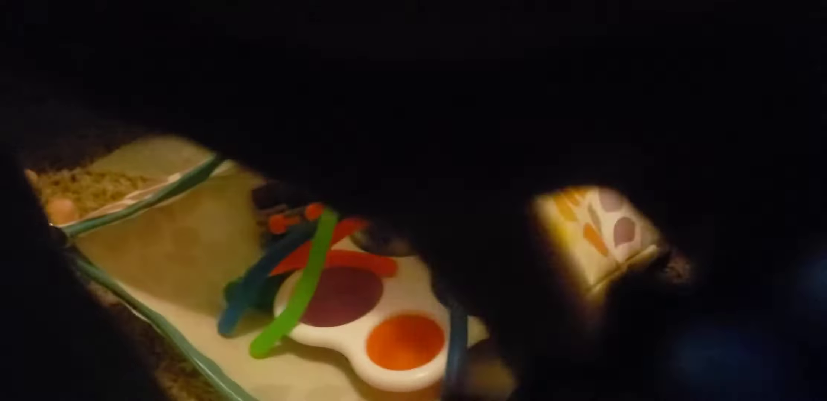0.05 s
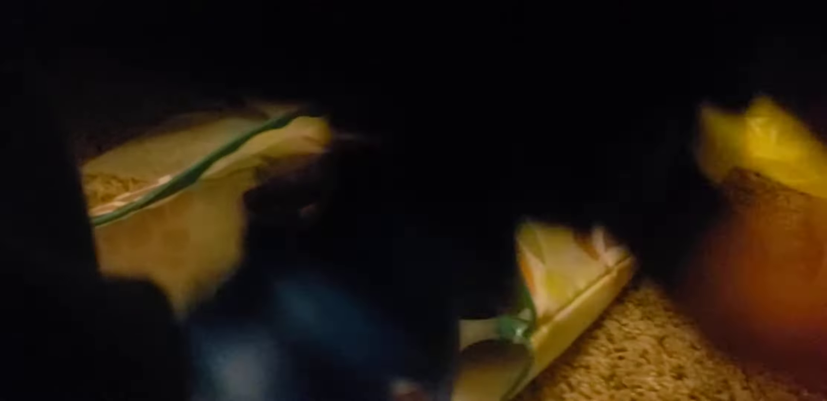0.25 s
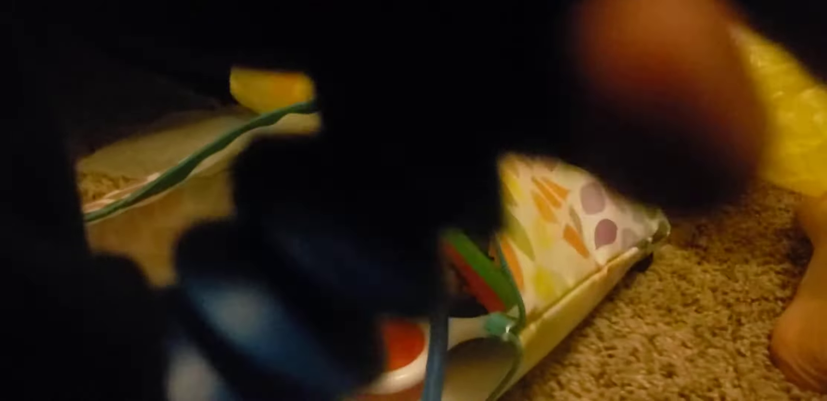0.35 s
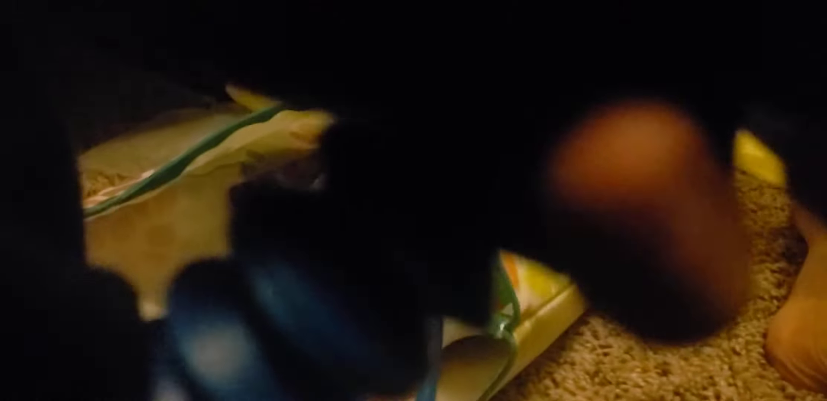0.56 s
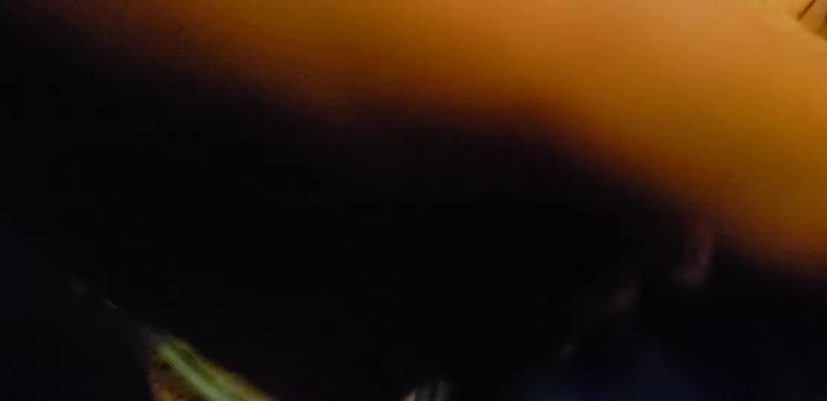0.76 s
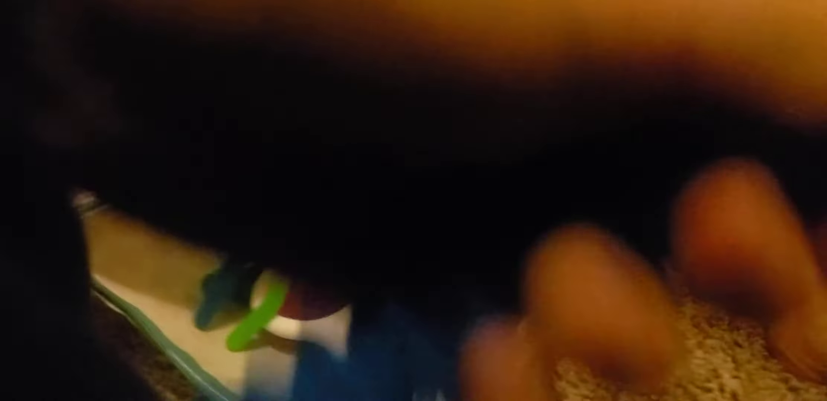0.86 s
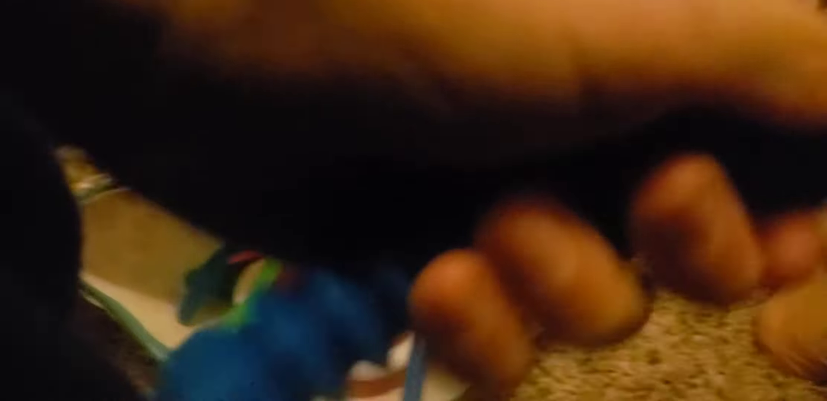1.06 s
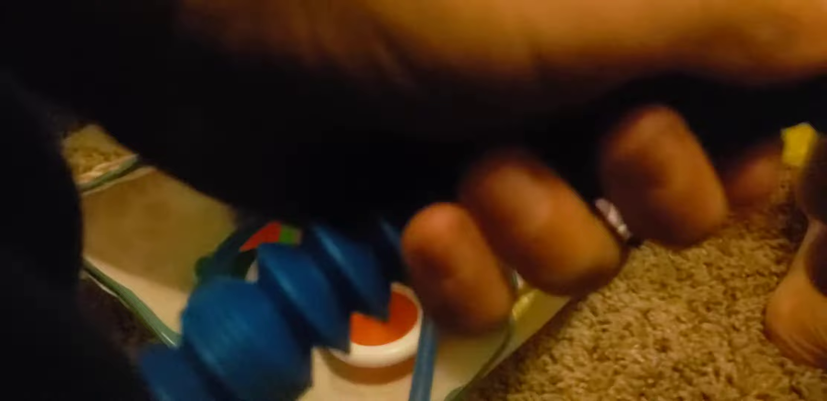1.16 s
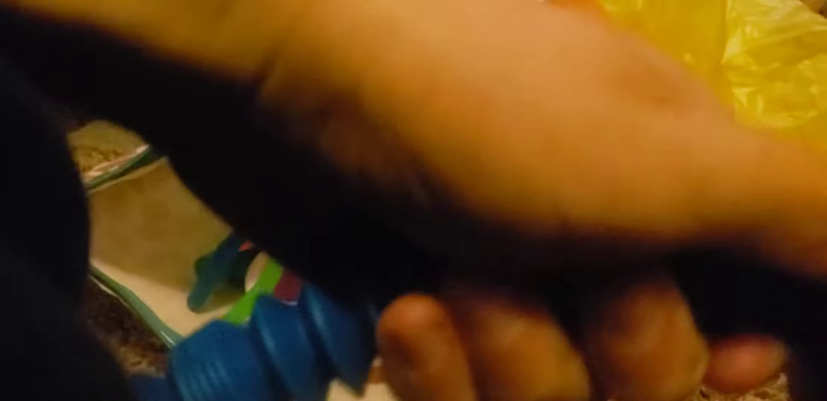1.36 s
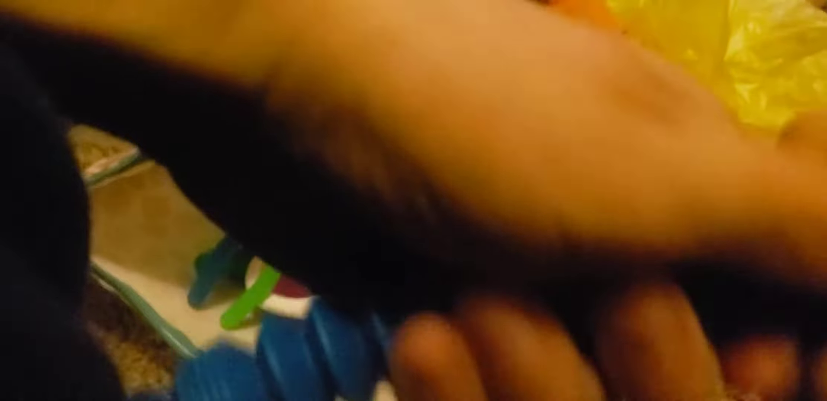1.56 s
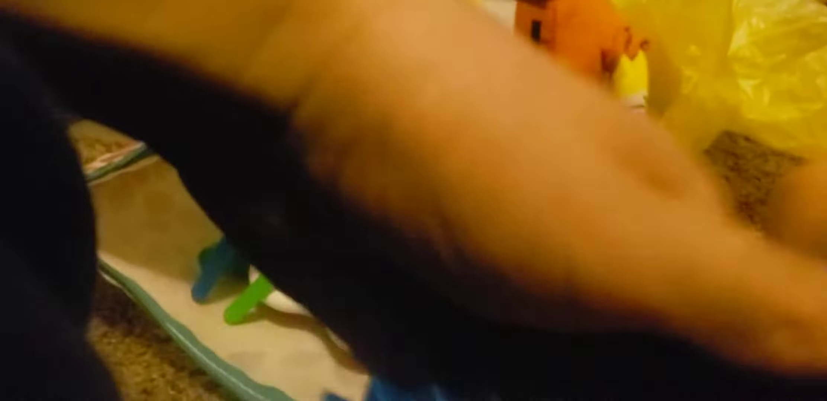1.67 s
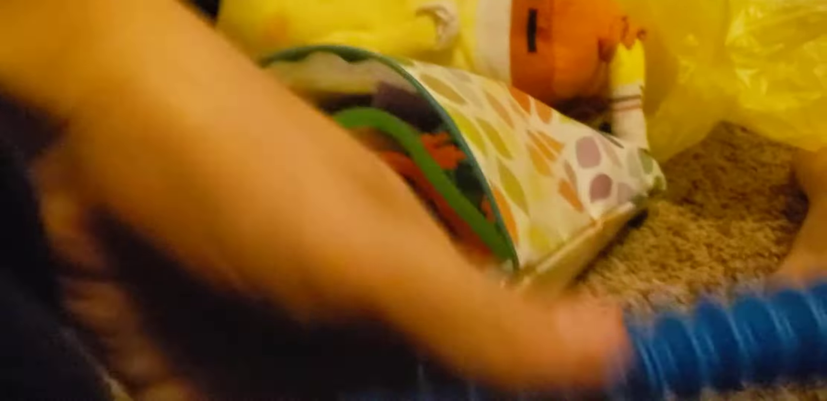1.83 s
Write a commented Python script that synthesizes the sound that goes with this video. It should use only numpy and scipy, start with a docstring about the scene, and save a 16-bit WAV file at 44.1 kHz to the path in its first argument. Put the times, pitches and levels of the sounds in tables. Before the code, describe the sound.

Sharp hollow pops and clicks from a corrugated plastic tube flexed by hand, close up.

```python
"""A corrugated plastic toy tube is worked in the hands, close up, in a small carpeted room.
Rib after rib snaps over: the thin wall cracks and the air column inside rings, higher as the tube
gets shorter. The creased plastic crinkles after each pop. Between pops the ribs tick; the hands
rub softly along the plastic and take up the jolts with dull thumps."""
import sys
import numpy as np
from scipy import signal
from scipy.fft import rfft, irfft
from scipy.io import wavfile
from scipy.ndimage import uniform_filter1d

SR = 44100
rng = np.random.default_rng(int(sys.argv[2]) if len(sys.argv) > 2 else 0)


def put_to_file(sound):
    """Save the sound as 16-bit audio at rate SR, in the file named by the first command-line argument."""
    columns = np.atleast_2d(sound).T  # one column per channel
    safe = np.clip(columns, -1, 1)
    whole_steps = np.round(safe * 32767)
    wavfile.write(sys.argv[1], SR, whole_steps.astype(np.int16))


N = 83790


def from_db(db):
    """Decibels to gain."""
    return 10 ** (np.asarray(db) / 20)


def at_hz(points, hz):
    """Interpolate a table on a log-frequency axis."""
    table_hz, values = np.transpose(points)
    return np.interp(np.log(np.maximum(hz, 1)), np.log(table_hz), values)


def in_time(rows):
    """Interpolate a time curve at every sample."""
    return np.interp(np.arange(N) / SR, *np.transpose(rows))


def coloured(x, points, share=1):
    """Zero-phase EQ; share scales the dB curve."""
    n = x.shape[-1]
    gain = from_db(share * at_hz(points, np.fft.rfftfreq(2 * n, 1 / SR)))
    return irfft(rfft(x, 2 * n) * gain, 2 * n)[..., :n]


def high_pass(x, hz):
    """Second-order bass cut."""
    return signal.sosfilt(signal.butter(2, hz, "high", fs=SR, output="sos"), x)


def stereo_noise(size, side_db):
    """White noise, nearly the same in both channels."""
    mid, side = rng.standard_normal((2, size))
    return mid + from_db(side_db) * side * np.array([[1], [-1]])


def grain(rate_hz, spread_db):
    """Fast random gain flicker."""
    flicker = uniform_filter1d(rng.standard_normal(N), int(SR / rate_hz))
    return from_db(spread_db * flicker / flicker.std())


def add(out, start_s, sound):
    """Mix a sound into a track."""
    i = int(start_s * SR)
    out[i:i + len(sound)] += sound[:N - i]


def burst(hz, peak_s):
    """Heavily damped resonance; the envelope reaches 1 at peak_s."""
    t = np.arange(SR // 5) / SR
    return -t / peak_s * np.exp(1 - t / peak_s) * np.sin(2 * np.pi * hz * t)


# Rub envelope: time_s, level_db
RUB_LEVEL = [(0, -59), (0.03, -55), (0.09, -68.5), (0.14, -63.5), (0.19, -58), (0.24, -58.5), (0.55, -66.5),
             (0.62, -54), (0.69, -57), (0.73, -49), (0.77, -53), (0.81, -64), (0.9, -55), (0.94, -68),
             (1.0, -55), (1.07, -51.5), (1.19, -54), (1.25, -70), (1.32, -66.5), (1.4, -68.5),
             (1.55, -66.5), (1.575, -59), (1.6, -71), (1.64, -56), (1.7, -59.5), (1.75, -56), (1.82, -53),
             (1.88, -66)]
# Rub spectrum: freq_hz, gain_db
RUB_SPECTRUM = [(880, -47), (1500, -19), (1780, -16.5), (1980, -23), (2340, -14.5), (2590, -14), (4040, -9),
                (5600, 4), (6960, -9), (7920, -17), (9650, -1.5), (15100, -13.5), (16000, -17.5)]
# Rustle envelope: time_s, level_db
RUSTLE_LEVEL = [(0, -71), (0.2, -82.5), (0.5, -75.5), (0.6, -73), (0.66, -59.5), (0.75, -67), (0.81, -79),
                (1.05, -79), (1.55, -76), (1.7, -82), (1.75, -71.5), (1.9, -85)]
# Rustle spectrum: freq_hz, gain_db
RUSTLE_SPECTRUM = [(20, -9.5), (50, 5.5), (100, -6), (200, -10.5), (400, -14), (800, -23.5), (1100, -13),
                   (1600, -27), (3000, -35), (16000, -55.5)]


def hands(side_db=-29):
    """Skin slides on plastic with a grainy hiss, over a dull handling rustle."""
    friction = grain(rate_hz=350, spread_db=2) * stereo_noise(N, side_db)
    rub = coloured(friction, RUB_SPECTRUM)
    rustle = coloured(stereo_noise(N, side_db), RUSTLE_SPECTRUM)
    rub *= from_db(in_time(RUB_LEVEL)) / rub.std()
    rustle *= from_db(in_time(RUSTLE_LEVEL)) / rustle.std()
    return rub + rustle


def round_trips(crack, pitch_hz, feedback):
    """A crack returns from the tube's ends once per period of the air column."""
    delay = round(SR / pitch_hz)
    loop = np.r_[1, np.zeros(delay - 1), -feedback]
    return signal.lfilter([1], loop, crack + 1e-18)  # offset avoids denormals


# Air column modes: pitch_ratio, level_db, t60_s
AIR_COLUMN_MODES = [(0.96, -10, 0.12), (2.005, 0.5, 0.076), (2.985, -2, 0.049), (3.99, -17, 0.029),
                    (4.96, -14.5, 0.035), (5.85, -19, 0.025), (8.5, -21, 0.02)]


def air_column(pitch_hz, tilt_db_per_oct, t60_scale, next_pop_s, attack_s=0.00006, choke_s=0.004):
    """A suction pulse runs up and down the open tube, losing overtones first, until the next pop."""
    t = np.arange(SR // 5) / SR
    ring = np.zeros(len(t))
    for ratio, level_db, t60_s in AIR_COLUMN_MODES:
        envelope_db = level_db + tilt_db_per_oct * np.log2(ratio / 2) - 60 * t / (t60_s * t60_scale)
        ring += from_db(envelope_db) * np.cos(2 * np.pi * ratio * pitch_hz * t)
    choke = np.exp(-np.maximum(t - next_pop_s, 0) / choke_s)
    pole = np.exp(-1 / (attack_s * SR))
    return signal.lfilter([pole - 1], [1, -pole], ring * choke)


# Ribs snapping over: start_s, pitch_hz, air_db, tilt_db_per_oct, t60_scale, flex_db, flex_hz,
# knock_db, knock_hz, snap_db, snap_hz, sizzle_db, edge_db, send_db
RIB_POPS = [ (0.2428, 490.6, -21.5, 7, 1.0, -11, 2460, -5.5, 4360, -5, 5670, -11, -29.5, -24),
            (0.2656, 489, -15.5, 2, 1.0, -2, 2540, -6, 4340, -4, 5560, -15.5, -14.5, -24.5),
            (0.3450, 500.3, -13, 1.5, 0.92, -10.5, 2080, -7, 3900, -26.5, 6050, -15.5, -21.5, -23),
            (0.3885, 518, -19, -1.5, 0.52, -6, 2020, -9, 4170, -15.5, 5450, -24, -36, -22),
            (0.399, 548, -25, 4.5, 0.27, -19, 2340, -11.5, 3660, -4.5, 5250, -20, -21, -27),
            (0.4136, 525.6, -25, -2.5, 1, -6.5, 1944, -13, 3600, -8.5, 5000, -31, -35, -19.5),
            (0.4162, 536.5, -14, 2.5, 0.42, -16.5, 2607, -10, 3800, -4.5, 5380, -23, -18, -21.5),
            (0.4407, 553.8, -28.5, 8, 0.9, -18.5, 2450, -6.5, 4100, -4, 5490, -26.5, -27.5, -23),
            (1.0915, 540, -19.5, -3.5, 0.48, -9.5, 2360, -9, 3145, -8, 6160, -10.5, -19.5, -21.5),
            (1.2967, 538.3, -30.5, -9.5, 0.43, -56, 1690, -32.5, 3060, -11.5, 5660, -20, -44.5, -18),
            (1.3416, 520, -30.5, -11.5, 0.3, -49, 1500, -25, 3430, -14.5, 6000, -18.5, -29, -25),
            (1.4385, 558.5, -24, 4.5, 0.44, -26, 2470, -9, 3570, -4.5, 5490, -24, -35, -8.5),
            (1.448, 589, -32.5, -9, 0.7, -24.5, 2440, -9.5, 3390, -9, 5500, -13.5, -39, -14.5),
            (1.4530, 603.3, -21, 2, 0.62, -52, 2440, -11.5, 3700, -6, 5350, -16.5, -33, -18), ]


def pops():
    """Each rib cracks the wall and rings the air column; returns direct sound and room send."""
    direct, send = np.zeros((2, N))
    next_starts_s = [row[0] for row in RIB_POPS[1:]] + [N / SR]
    for row, next_s in zip(RIB_POPS, next_starts_s):
        (start_s, pitch_hz, air_db, tilt_db_per_oct, t60_scale, flex_db, flex_hz,
         knock_db, knock_hz, snap_db, snap_hz, sizzle_db, edge_db, send_db) = row
        flex = from_db(flex_db) * burst(flex_hz, peak_s=0.00027)
        knock = from_db(knock_db) * burst(knock_hz, peak_s=0.00026)
        snap = from_db(snap_db) * burst(snap_hz, peak_s=0.00029)
        sizzle = from_db(sizzle_db) * burst(hz=10000, peak_s=0.00014)
        edge = from_db(edge_db) * burst(hz=13300, peak_s=0.00009)
        wall = (snap + round_trips(flex, pitch_hz, feedback=0.45)
                - round_trips(knock, pitch_hz, feedback=0.15)
                + round_trips(sizzle - edge, pitch_hz, feedback=0.29))
        air = from_db(air_db) * air_column(pitch_hz, tilt_db_per_oct, t60_scale, next_s - start_s)
        pop = high_pass(wall, hz=800) + air
        add(direct, start_s, pop)
        add(send, start_s, from_db(send_db) * pop)
    return direct, send


# Grip scratch envelope: time_s, level_db
SCRATCH_LEVEL = [(0.6, -82.5), (0.655, -57), (0.76, -53), (0.8, -84.5)]
# Crinkle and scratch spectrum: freq_hz, gain_db
CRINKLE_SPECTRUM = [(1000, -29.5), (4000, -13), (6000, -8.5), (7600, -13), (9800, 0), (12500, -2.5),
                    (15000, -2), (16500, -13)]


def crinkle(re_edge_db=-18, t60_s=0.13):
    """Creased plastic crinkles after each pop's sharp edge and scratches as the grip shifts."""
    envelope = from_db(in_time(SCRATCH_LEVEL))
    t = np.arange(SR // 5) / SR
    for start_s, *_, edge_db, _ in RIB_POPS:
        add(envelope, start_s, from_db(edge_db + re_edge_db - 60 * t / t60_s))
    crackle = grain(rate_hz=1100, spread_db=4) * rng.standard_normal(N)
    return coloured(envelope * crackle, CRINKLE_SPECTRUM)


# Jolts taken up by the hands: start_s, level_db, pitch_hz
HAND_THUMPS = [(0.246, -40.5, 95), (0.271, -29.5, 76), (0.346, -40, 95), (0.392, -31.5, 90),
               (0.418, -31, 72), (0.442, -35.5, 80), (0.67, -59.5, 150), (0.722, -57.5, 65),
               (1.091, -62.5, 110), (1.297, -45.5, 95), (1.338, -41.5, 80), (1.445, -42, 110),
               (1.463, -40, 60)]


def thumps():
    """Soft, low recoil of the tube in the hands."""
    out = np.zeros(N)
    for start_s, level_db, pitch_hz in HAND_THUMPS:
        add(out, start_s, from_db(level_db) * burst(pitch_hz, peak_s=0.006))
    return out


# Rib slips: start_s, level_db
RIB_TICKS = [(0.2766, -16.5), (0.5680, -40.5), (0.5974, -29), (0.6204, -38), (0.6287, -43), (0.6354, -30.5),
             (0.638, -28), (0.646, -40), (0.6554, -44), (0.6712, -37), (1.2755, -47), (1.6095, -36),
             (1.6374, -26.5), (1.65, -35.5), (1.6702, -35), (1.6812, -37.5), (1.745, -41.5)]
# Tick resonances: freq_hz, gain_db, peak_s
RIB_MODES = [(1095, -44.5, 0.001), (1960, -24.5, 0.00021), (3880, -12.5, 0.00024), (5725, -2, 0.00021),
             (10000, -12, 0.00012), (12760, -16.5, 0.00008)]


def ticks(spread_db=1.0, detune=0.053):
    """Ribs slip without snapping over, each with its own colour."""
    out = np.zeros(N)
    for start_s, level_db in RIB_TICKS:
        for k, (freq_hz, gain_db, peak_s) in enumerate(RIB_MODES):
            gain = from_db(level_db + gain_db + spread_db * rng.normal())
            detuned_hz = freq_hz * (1 + detune * rng.normal())
            add(out, start_s, (-1) ** k * gain * burst(detuned_hz, peak_s))
    return out


# Room decay: freq_hz, t60_s
ROOM_DECAY = [(100, 0.089), (500, 0.19), (1200, 0.18), (2500, 0.15), (5500, 0.087), (12000, 0.1)]
# Reflection spectrum: freq_hz, gain_db
ROOM_SPECTRUM = [(100, -3.5), (500, 7), (1000, -1), (2500, 5), (5500, 3), (8000, 2.5), (11000, 9.5),
                 (16000, 4)]


def room(send, predelay_s=0.004, build_s=0.009):
    """Dense reflections build quickly and last longest in the midrange."""
    n = SR // 2
    t, hz = np.arange(n) / SR, np.fft.rfftfreq(n, 1 / SR)
    spectrum = rfft(stereo_noise(n, side_db=-27.5))
    centres_hz, t60s_s = np.transpose(ROOM_DECAY)
    tail = np.zeros((2, n))
    for weights, t60_s in zip(np.eye(len(centres_hz)), t60s_s):
        band = irfft(spectrum * at_hz(np.c_[centres_hz, weights], hz), n)
        tail += band * from_db(-60 * t / t60_s)
    tail *= np.clip((t - predelay_s) / build_s, 0, 1)
    tail /= np.sqrt(np.sum(tail[0] ** 2))
    return signal.fftconvolve(send[None], coloured(tail, ROOM_SPECTRUM), axes=1)[:, :N]


# Stereo balance: freq_hz, left_minus_right_db
BALANCE = [(100, 1), (1000, 0.6), (3000, 1.2), (6000, 1.06), (9500, 5), (14000, -3)]


def scene(tick_send_db=-18.5, thump_send_db=-7):
    """Tube, hands and room, a little left of centre."""
    popping, pop_send = pops()
    ticking, thumping = ticks(), thumps()
    reverb = room(pop_send + from_db(tick_send_db) * ticking + from_db(thump_send_db) * thumping)
    left, right = popping + ticking + thumping + reverb + crinkle() + hands()
    return np.array([coloured(left, BALANCE, share=0.5), coloured(right, BALANCE, share=-0.5)])


def record(dry, stopband_hz=17200):
    """Microphone: deep bass cut, clipping at full scale, steep top cut."""
    clipped = np.clip(high_pass(dry, hz=42.6), -1, 1)
    low_pass = signal.cheby2(16, 70, stopband_hz, fs=SR, output="sos")
    return signal.sosfilt(low_pass, clipped)


dry = scene()
out = record(dry)
put_to_file(out)
```